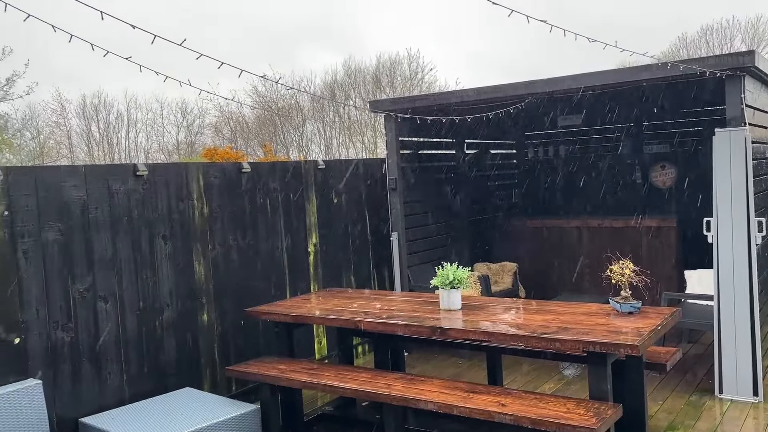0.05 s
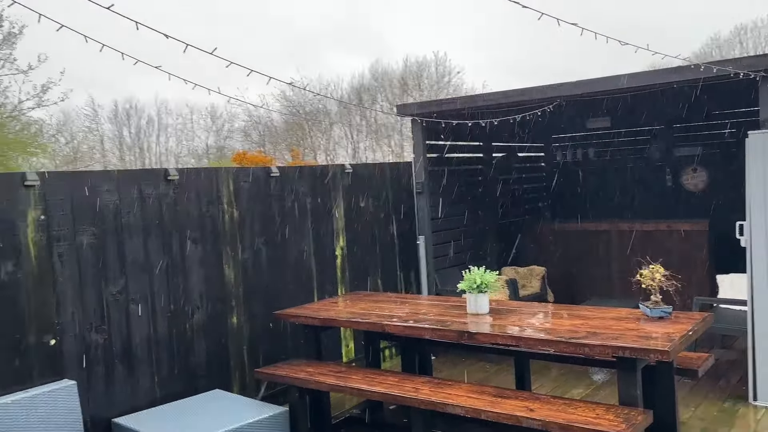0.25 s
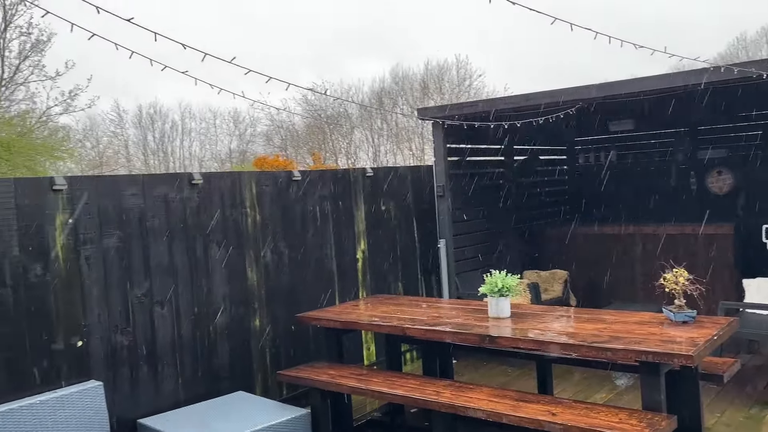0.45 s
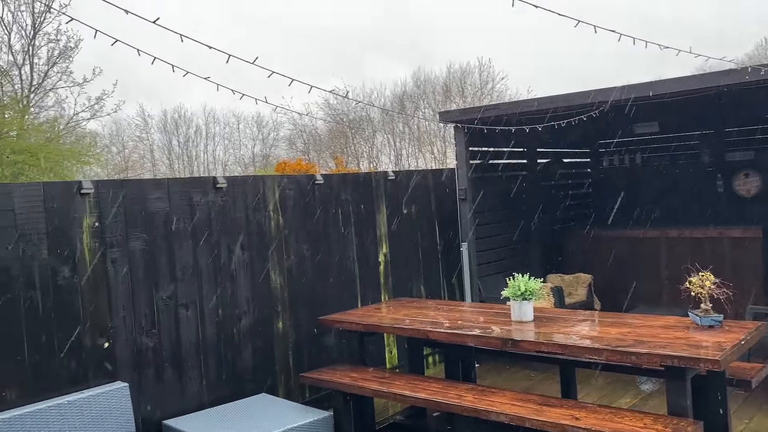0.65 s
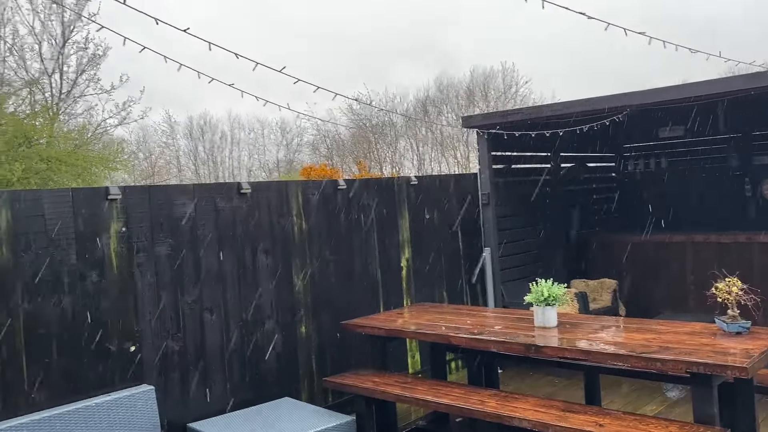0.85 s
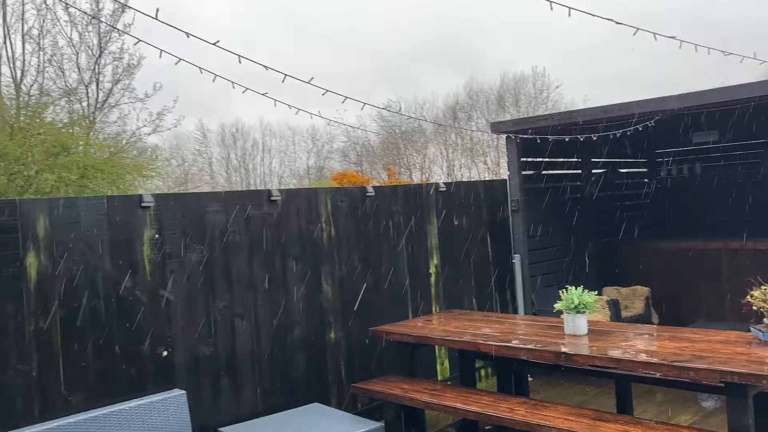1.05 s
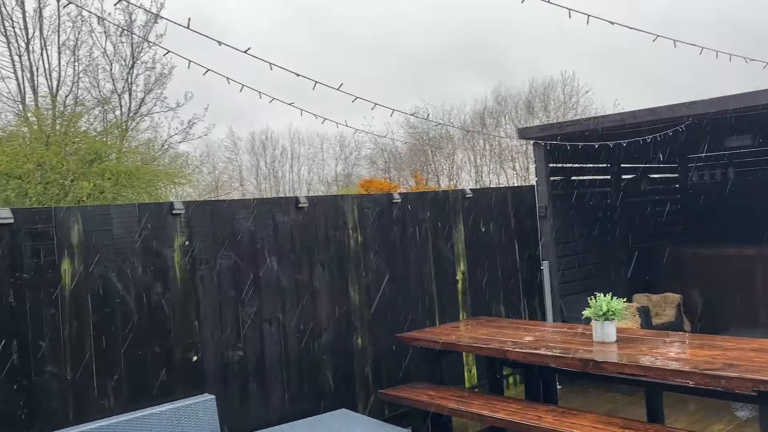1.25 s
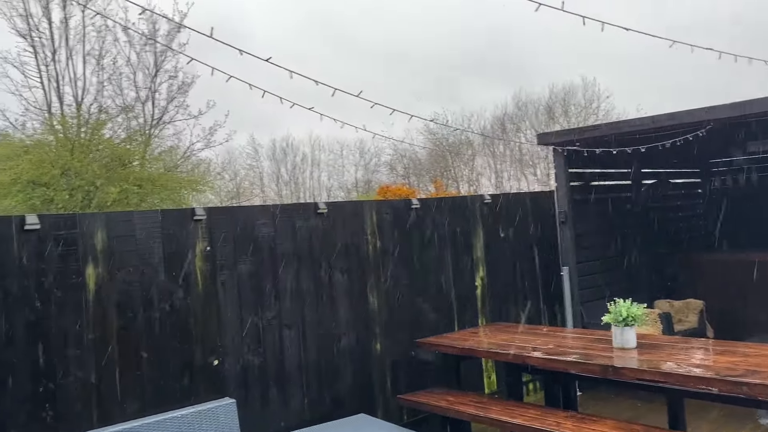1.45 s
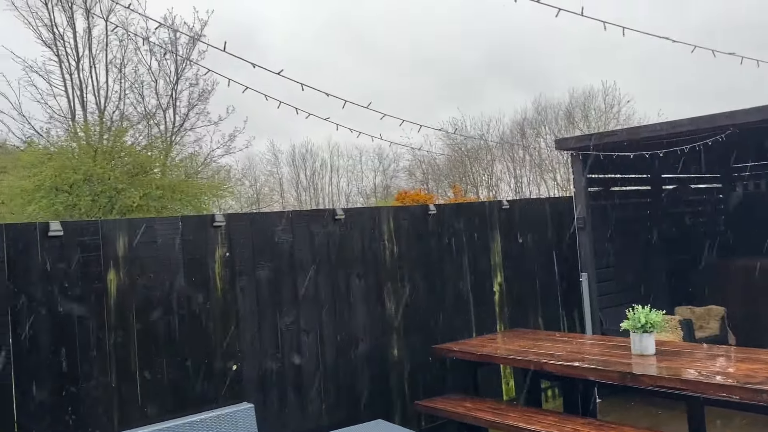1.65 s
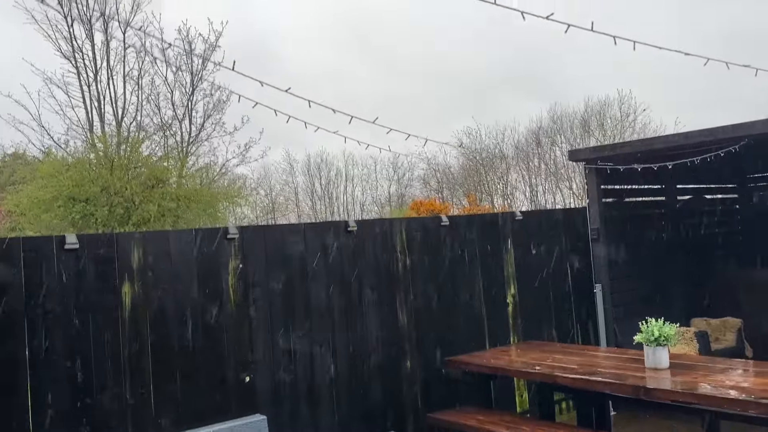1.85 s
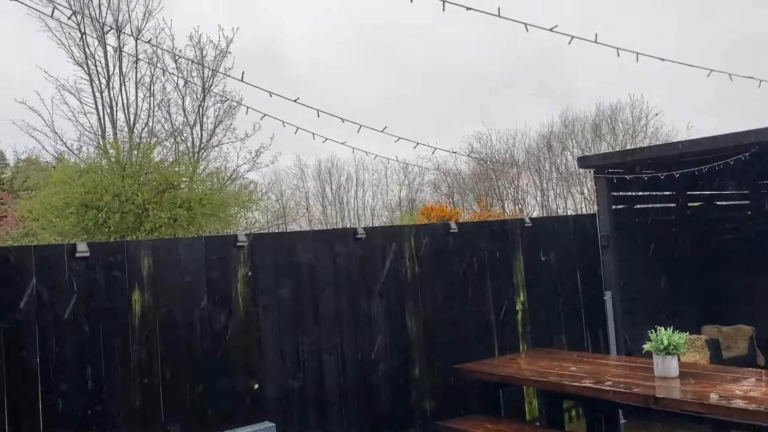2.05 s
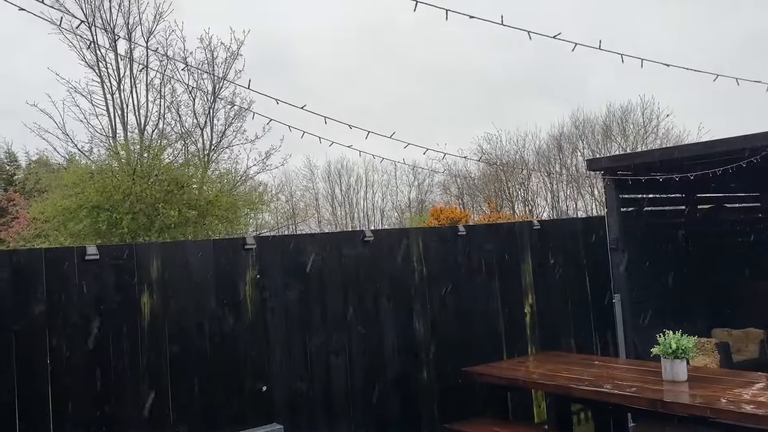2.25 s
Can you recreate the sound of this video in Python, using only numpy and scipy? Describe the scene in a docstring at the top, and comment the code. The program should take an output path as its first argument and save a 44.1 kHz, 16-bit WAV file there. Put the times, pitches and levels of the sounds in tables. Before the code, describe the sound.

Rain falling in a garden, with sharp drips ticking nearby and low gusts buffeting the microphone.

```python
"""A fine patter of steady rain on wet wood and paving in a fenced garden, over a soft far-off wash.
Single drops tick close by and echo from the ground and the fence. A few fat drips splatter into
droplets, and two faint pings ring from struck garden things. Gusts buffet the microphone with
a low flutter, a deep rumble and short thumps that fall in pitch."""
import sys
import numpy as np
from scipy import signal
from scipy.fft import rfft, irfft
from scipy.io import wavfile
from scipy.ndimage import uniform_filter1d

SR = 44100
rng = np.random.default_rng(int(sys.argv[2]) if len(sys.argv) > 2 else 0)


def wav_out(sig):
    """Save sig, one row per channel (or a flat mono array), as 16-bit PCM at SR to the path in sys.argv[1]."""
    wavfile.write(sys.argv[1], SR, np.round(np.clip(np.atleast_2d(sig).T, -1, 1) * 32767).astype(np.int16))


N = 105840
TIME = np.arange(N) / SR
FREQS = np.maximum(np.arange(N // 2 + 1) * SR / N, 1)

# How hard the rain patters. Each row: time in seconds, relative level in dB.
PATTER_LEVEL = [(0, -41), (0.12, -53.5), (0.18, -46.7), (0.3, -51), (0.43, -44.5), (0.5, -46), (0.56, -46),
                (0.69, -51.5), (0.76, -45), (0.9, -44.5), (1.03, -50), (1.21, -49.5), (1.37, -40.5),
                (1.48, -47.3), (1.55, -42), (1.68, -52), (1.78, -43), (1.94, -43.5), (2.1, -47),
                (2.16, -44), (2.28, -44.6), (2.4, -46.5)]
# The tone of the patter. Each row: frequency in Hz, boost or cut in dB.
PATTER_TONE = [(900, -68), (2000, -3.5), (3200, -8.5), (5500, -0.5), (8000, 1), (11000, 3.5), (13000, 2.5),
               (15500, 8)]
# Drops landing close by. Each row: start in seconds, relative level in dB, ring pitch in Hz,
# then the crack and the high spit, both in dB compared with the ring.
CLOSE_DROPS = [(0.161, -24.5, 6900, -0.5, 1), (0.2628, -30, 5800, 4, 7), (0.3112, -30, 6650, 0, 1),
               (0.3401, -35, 4160, 5, 6), (0.3621, -19, 4470, 1.5, -11), (0.4514, -20.5, 5060, 0, -2),
               (0.4688, -5.5, 5750, 0, -8), (0.5711, -23, 5050, -1, -5), (0.5995, -17, 6610, -1.5, -18),
               (0.7233, -21, 7300, 3.5, -16), (0.7497, -27.5, 4870, 4, -5), (0.7756, -30, 7200, 6, 8),
               (0.857, -19.5, 4550, 4.5, -18), (0.9233, -23.5, 5030, -4, -9),
               (0.9697, -24.5, 7440, -0.5, -10), (1.075, -31.5, 6800, 10, -9),
               (1.1508, -24, 7200, -0.5, -3), (1.3553, -24, 6700, 6, -3), (1.5614, -24, 5150, 0, -6)]
# Echoes from the ground and the fence. Each row: delay in seconds, gain in dB.
DROP_ECHOES = [(.003, -6), (0.017, -12.5)]
# Fat drips. Each row: start in seconds, level in dB, pitch in Hz, band width in Hz, fade in seconds.
FAT_DRIPS = [(0.4516, -22.5, 2900, 2180, 0.0025), (0.466, -38, 2620, 1280, 0.037),
             (0.469, -24, 6800, 4100, 0.0073), (.858, -52, 4900, 2500, .02),
             (1.255, -43, 6700, 3000, 0.009), (1.353, -41.5, 4480, 2000, 0.013),
             (1.314, -43, 4780, 2000, 0.0065), (1.406, -45, 6500, 2500, 0.031),
             (1.526, -37, 7840, 3015, 0.014), (1.562, -44.5, 5200, 1970, 0.02),
             (1.767, -37, 5560, 3000, 0.012), (1.84, -34, 4330, 2470, 0.011),
             (1.846, -34.5, 3200, 696, 0.02), (2.269, -40, 4260, 2580, 0.027)]
# Things set ringing by a drop. Each row: start in seconds, level in dB, pitch in Hz, fade in seconds.
RINGING_THINGS = [(.240, -48, 5700, 0.044), (.545, -41.5, 1435, 0.043)]
# How hard the wind flutters and rumbles. Each row: time in seconds, relative level in dB.
FLUTTER_GUSTS = [(0.0, -50.5), (0.07, -40.5), (0.16, -47), (0.31, -17), (0.41, -34.5), (0.51, -45.5),
                 (0.53, -31), (0.6, -56), (0.68, -34), (0.71, -59.5), (0.91, -35), (0.96, -53), (1.08, -41),
                 (1.1, -33.5), (1.12, -42), (1.3, -39), (1.34, -19.5), (1.37, -33.5), (1.43, -20),
                 (1.48, -37.5), (1.58, -39), (1.61, -25.5), (1.63, -57), (1.66, -25), (1.73, -28.5),
                 (1.76, -47), (1.83, -34.5), (1.86, -27), (1.98, -32.5), (2.0, -22), (2.02, -36.5),
                 (2.09, -32.5), (2.1, -20), (2.15, -49.5), (2.21, -40), (2.4, -55.5)]
RUMBLE_GUSTS = [(0.0, -48), (0.03, -65), (0.06, -39.5), (0.17, -43), (0.31, -27.5), (0.34, -53),
                (0.37, -15), (0.4, -26), (0.44, -39.5), (0.57, -37.5), (0.61, -55), (0.69, -35),
                (0.78, -47), (0.91, -37), (0.98, -41.5), (1.12, -33.5), (1.14, -38.5), (1.45, -24.5),
                (1.52, -39), (1.64, -27), (1.66, -39), (1.7, -25.5), (1.8, -36.5), (1.88, -23),
                (1.95, -33.5), (1.98, -28), (2.02, -32), (2.04, -32.5), (2.08, -29.5), (2.12, -27),
                (2.15, -40.5), (2.4, -45.5)]
# The tones of the flutter and the rumble. Each row: frequency in Hz, boost or cut in dB.
FLUTTER_TONE = [(60, -15), (110, -1), (170, 3), (260, -2), (400, -6), (520, -12), (700, -20.5),
                (1000, -57.5), (1600, -81)]
RUMBLE_TONE = [(20, -34), (33, -57), (45, -2.5), (64, -0.5), (85, -1.5), (120, -13), (180, -28.5),
               (400, -66.5)]
# Swirls of air hitting the microphone. Each row: start in seconds, level in dB, first pitch in Hz,
# fade in seconds, seconds until the pitch has halved.
EDDIES = [(.205, -26, 422, 0.011, 0.0102), (.248, -16, 385, .008, .008), (.290, -7, 318, 0.018, 0.0082),
          (0.367, -23, 87, 0.036, 0.073), (0.526, -21.5, 538, 0.0038, .004), (.665, -25, 650, .009, .004),
          (.680, -22, 130, .022, .025), (.819, -25, 1000, .006, .004), (.892, -24, 220, .012, .02),
          (1.092, -17.5, 620, .017, .003), (1.425, -12, 554, 0.0097, 0.0048), (1.452, -21, 89, 0.027, 0.04),
          (1.689, -18, 500, 0.012, 0.0032), (1.865, -15.5, 573, 0.013, 0.0043),
          (1.949, -15.5, 660, 0.0047, 0.0049), (1.994, -11, 640, 0.013, 0.0033),
          (2.103, -10.5, 750, 0.0068, 0.0056)]
# The tones of the far rain and the garden's echo. Each row: frequency in Hz, boost or cut in dB.
WASH_TONE = [(40, -12.5), (120, -1), (300, -14), (550, -3.5), (1000, -7), (1600, -11), (2600, -18),
             (4000, -20.5), (7000, -28), (10000, -29.5), (13000, -29.5), (15500, -26.5)]
GARDEN_TONE = [(700, 15), (1400, 25), (2000, 11), (2700, 3), (5000, 8), (8000, 7), (15000, 7)]
# How alike the rain is on the left and right. Each row: frequency in Hz, likeness from 0 to 1.
STEREO_LIKENESS = [(60, 0.3), (450, 0.22), (750, 0.15), (1200, 0.021), (1900, 0.017), (2500, 0.7),
                   (5600, 0.2), (6600, 0.84), (15000, .995)]
# Which side is louder. Each row: frequency in Hz, left minus right in dB.
STEREO_BALANCE = [(300, 7.5), (550, 1.5), (1300, -1.7), (2300, 0), (3100, 2.5), (4200, 2), (5600, 3),
                  (7200, .5), (9000, 0)]
# Which side is earlier. Each row: frequency in Hz, how far the left wave is ahead in radians.
STEREO_LEAD = [(2300, 0), (3200, .7), (4400, .2), (5400, -.6), (6400, .1), (7400, -.1), (8600, -1.6),
               (10000, -3.14), (11400, -4.8), (12800, -6.28), (15700, -9.4)]


def patter(drops_per_s=4000, flurry_db=2.5, gain_db=-2):
    """Small drops hit wet surfaces in little flurries, each ringing for a cycle or two."""
    pitches = np.geomspace(1800, 14000, 10)
    drops = sum(resonance(impacts(drops_per_s / len(pitches)), hz, hz / 2) / np.sqrt(hz)
                for hz in pitches)
    level_db = gain_db + over_time(PATTER_LEVEL) + flurry_db * flicker()
    return from_db(level_db) * with_tone(drops, PATTER_TONE)


def close_drops(gain_db=-2.5, ring_width_hz=1760, spit_hz=13800, spit_width_hz=8000):
    """Each near drop lands with a brief ring, a crack and a high spit."""
    out = np.zeros(N)
    crack_band = signal.butter(1, [2200, 16500], "band", fs=SR, output="sos")
    for start, db, hz, crack_db, spit_db in CLOSE_DROPS:
        hit = start + 0.001186
        click = signal.unit_impulse(N, int(hit * SR))
        ring = resonance(resonance(click, hz, ring_width_hz), hz, 2 * ring_width_hz)
        ring /= np.abs(ring).max()
        crack = rng.standard_normal(N) * fade(hit, fade_s=0.00035)
        crack = signal.sosfilt(crack_band, signal.sosfilt(crack_band, crack))
        spit = rng.standard_normal(N) * fade(hit, fade_s=0.0003)
        spit = resonance(resonance(spit, spit_hz, spit_width_hz), spit_hz, spit_width_hz)
        spit /= np.abs(spit).max()
        out += from_db(db + gain_db) * (ring + from_db(crack_db) * crack + from_db(spit_db) * spit)
    return out


def splats(droplets_per_s=2400):
    """A fat drip breaks into a spray of droplets that dies away."""
    out = np.zeros(N)
    for start, db, hz, width_hz, fade_s in FAT_DRIPS:
        spray = resonance(resonance(impacts(droplets_per_s), hz, width_hz), hz, 2 * width_hz)
        out += from_db(db) * fade(start, fade_s) * unit_level(spray)
    return out


def pings(rise_s=0.0045):
    """Garden things struck by a drop ring with a faint, thin note."""
    return sum(from_db(db) * (fade(start, fade_s) - fade(start, rise_s)) * np.sin(2 * np.pi * hz * TIME)
               for start, db, hz, fade_s in RINGING_THINGS)


def wind():
    """Gusts flutter and rumble on the microphone."""
    flutter = from_db(over_time(FLUTTER_GUSTS) - 1.5) * turbulence(FLUTTER_TONE, steady_s=0.022)
    rumble = from_db(over_time(RUMBLE_GUSTS)) * turbulence(RUMBLE_TONE, steady_s=0.032)
    return flutter + rumble


def turbulence(tone, steady_s, likeness=0.85):
    """Churning air makes a low noise of even strength, mostly alike on the left and right."""
    shared, unshared = with_tone(rng.standard_normal((2, N)), tone)
    power = np.abs(signal.hilbert(shared)) ** 2 / 2
    steady = shared / np.sqrt(uniform_filter1d(power, int(steady_s * SR)))
    return steady + np.sqrt((1 - likeness) / (1 + likeness)) * unshared * [[1], [-1]]


def thumps(rise_s=0.0014):
    """A swirl of air swells quickly, then slows and dies as it passes the microphone."""
    out = np.zeros(N)
    for start, db, hz, fade_s, halving_s in EDDIES:
        age = np.maximum(TIME - start, 0)
        swell = 1 - np.exp(-(age / rise_s) ** 2)
        cycles = hz * halving_s * np.log1p(age / halving_s)
        out += from_db(db) * swell * fade(start, fade_s) * np.sin(2 * np.pi * cycles)
    return out


def far_wash(level_db=-43, flicker_db=1.0):
    """Countless far drops merge into a soft, slightly flickering noise."""
    return from_db(level_db + flicker_db * flicker()) * with_tone(rng.standard_normal(N), WASH_TONE)


def with_echoes(sound, cutoff_hz=8100):
    """The ground and the fence each add a later, duller copy of a sound."""
    dull = signal.sosfilt(signal.butter(1, cutoff_hz, fs=SR, output="sos"), sound)
    return sound + sum(from_db(db) * np.pad(dull, (int(delay * SR), 0))[:N] for delay, db in DROP_ECHOES)


def garden_tail(sound, gain_db=-3, split_hz=2300, low_s=0.99, high_s=0.22):
    """Fence, shed and furniture scatter sound into a blurred echo whose treble dies first."""
    noise = with_tone(rng.standard_normal(N), GARDEN_TONE)
    tail = np.zeros(N)
    for band, seconds, sign in [("low", low_s, 1), ("high", high_s, -1)]:
        part = signal.sosfilt(signal.butter(2, split_hz, band, fs=SR, output="sos"), noise)
        tail += sign * part * fade(0, seconds / np.log(1000))  # 60 dB down after this many seconds
    return from_db(gain_db) * signal.fftconvolve(sound, tail / np.linalg.norm(tail))[:N]


def microphone_pair(shared, unshared):
    """Two microphone openings hear partly the same sound, with a different level and timing."""
    likeness = over_frequency(STEREO_LIKENESS)
    mid = rfft(shared) * np.sqrt((1 + likeness) / 2)
    side = rfft(unshared) * np.sqrt((1 - likeness) / 2)
    lean_left = from_db(over_frequency(STEREO_BALANCE) / 2) * np.exp(0.5j * over_frequency(STEREO_LEAD))
    return irfft(np.array([(mid + side) * lean_left, (mid - side) / lean_left]), N)


def impacts(per_s, size_spread_db=2.3):
    """Random clicks, many small and a few large."""
    sizes = from_db(size_spread_db * np.minimum(rng.exponential(1, N), 5))
    return (rng.random(N) < per_s / SR) * sizes * rng.choice([-1, 1], N)


def flicker():
    """A random wobble, mostly slower than about 25 times a second."""
    return with_tone(rng.standard_normal(N), [(3, -10), (8, 0), (25, -3), (120, -50)])


def resonance(sound, hz, width_hz):
    """Make a sound ring at one pitch; a wider band rings more briefly."""
    damping = np.exp(-np.pi * width_hz / SR)
    feedback = [1, -2 * damping * np.cos(2 * np.pi * hz / SR), damping ** 2]
    return signal.lfilter(np.array([1, 0, -1]) * (1 - damping ** 2) / 2, feedback, sound + 1e-18)


def fade(start, fade_s):
    """Jump to 1 at the start, then shrink to about a third every fade_s seconds."""
    return (TIME >= start) * np.exp(-np.clip((TIME - start) / fade_s, 0, 60))


def with_tone(sound, tone):
    """Boost and cut a sound's frequencies, then set its average level to 1."""
    return unit_level(irfft(rfft(sound) * from_db(over_frequency(tone)), N))


def over_time(rows):
    """Join a table's points into one value for every sample."""
    return np.interp(TIME, *np.transpose(rows))


def over_frequency(rows):
    """Join a table's points into one value for every frequency, with octaves evenly spaced."""
    hz, values = np.transpose(rows)
    return np.interp(np.log(FREQS), np.log(hz), values)


def unit_level(sound):
    """Set the average (root mean square) level to 1."""
    return sound / np.sqrt(np.mean(sound ** 2) + 1e-20)


def from_db(db):
    """Turn decibels into a number to multiply by."""
    return 10 ** (np.asarray(db) / 20)


def scene():
    """Rain near and far in stereo, with the wind on top."""
    ticks, spray = with_echoes(close_drops()), splats()
    shared = far_wash() + patter() + ticks + spray + pings() + garden_tail(ticks + spray)
    # Each call draws new random noise, so this part makes the two sides differ.
    unshared = far_wash() + patter() + splats() + garden_tail(ticks + spray)
    return microphone_pair(shared, unshared) + wind() + thumps()


def record(dry):
    """Cut off the very highest treble steeply."""
    cutoff_hz = 15700
    return irfft(rfft(dry) / np.sqrt(1 + (FREQS / cutoff_hz) ** 200), N)


dry = scene()
out = record(dry)
wav_out(out)
```